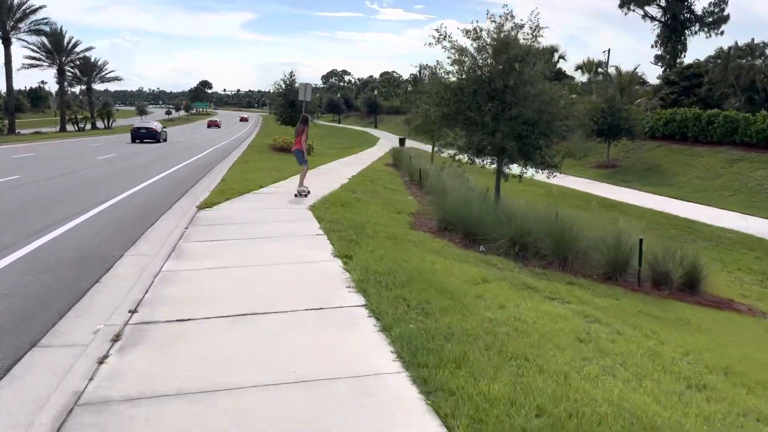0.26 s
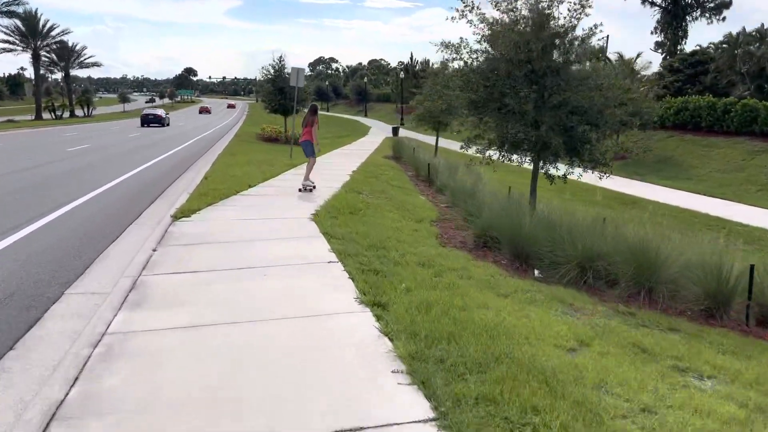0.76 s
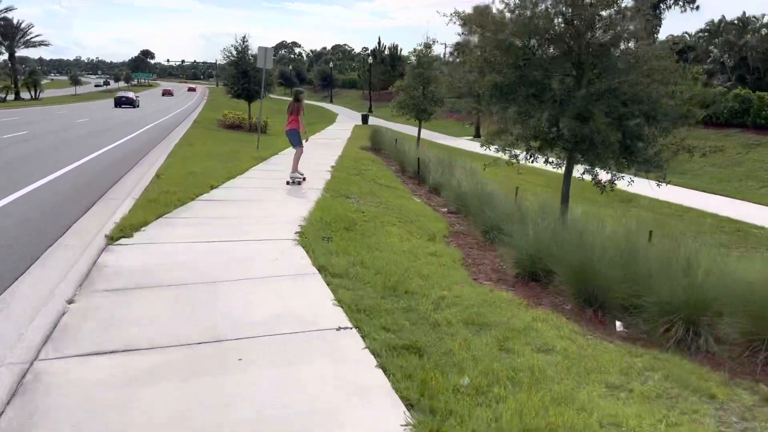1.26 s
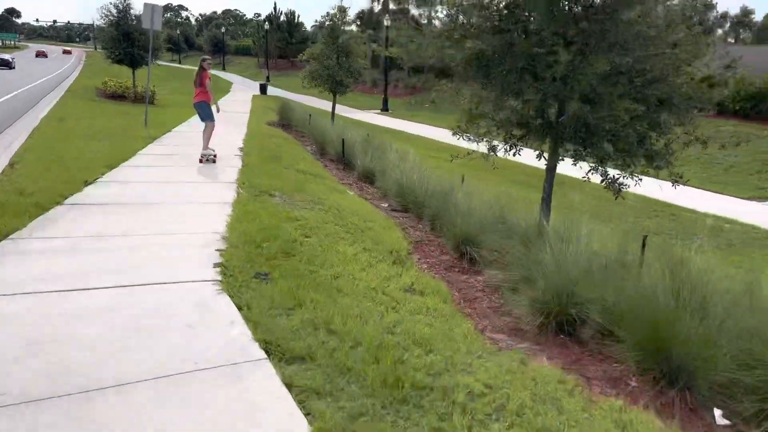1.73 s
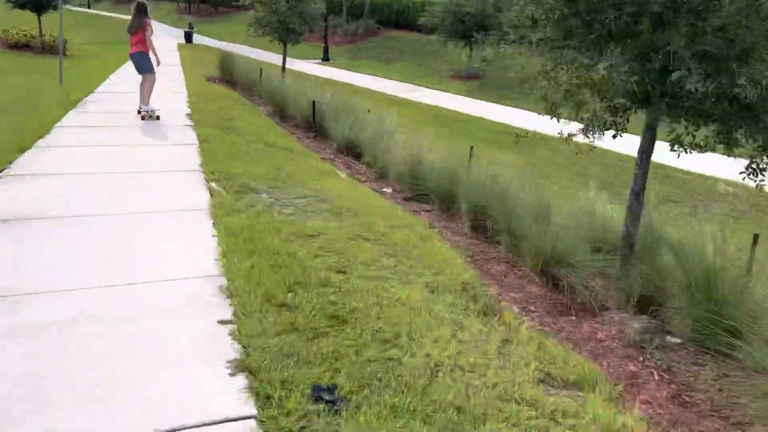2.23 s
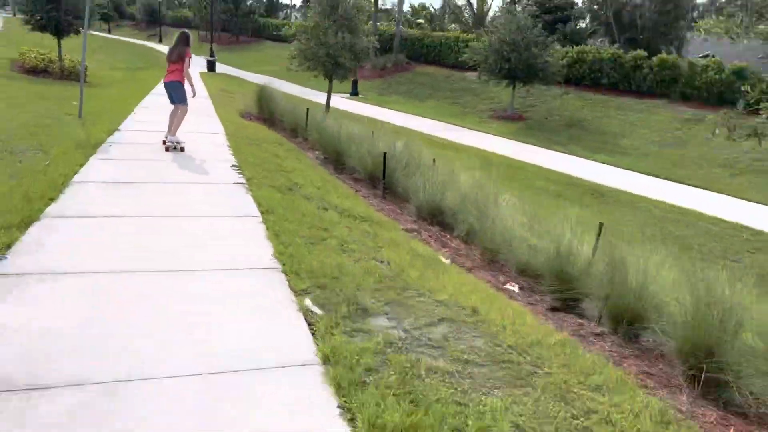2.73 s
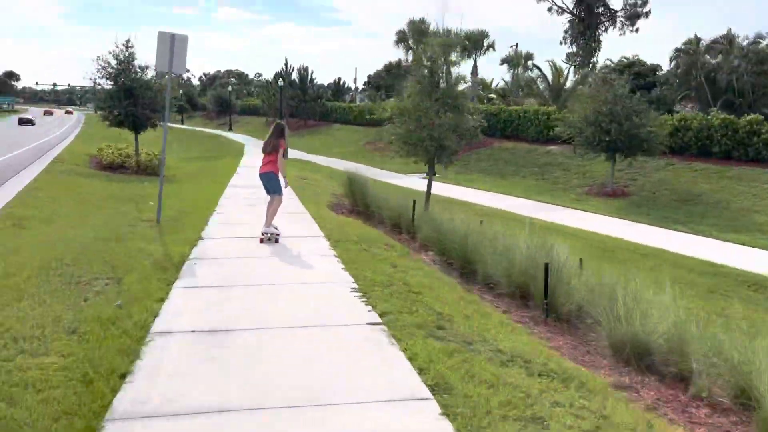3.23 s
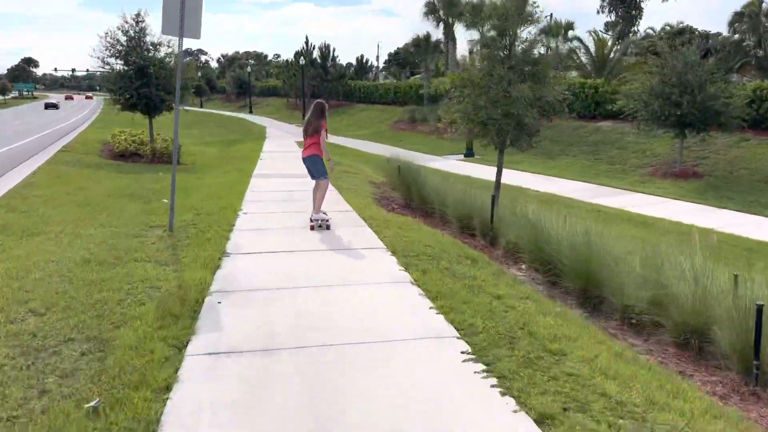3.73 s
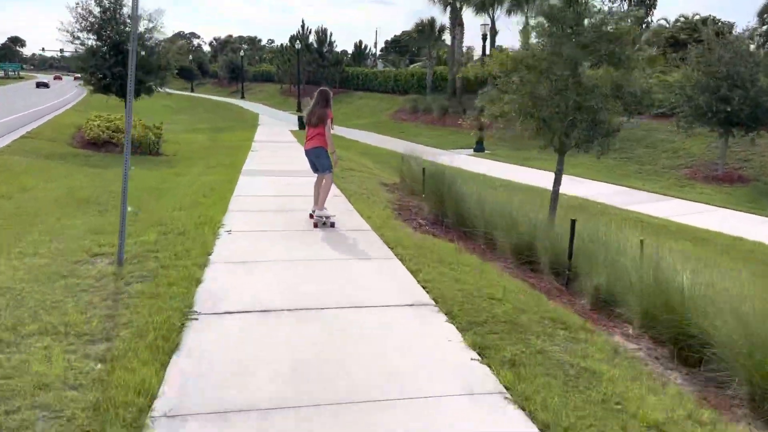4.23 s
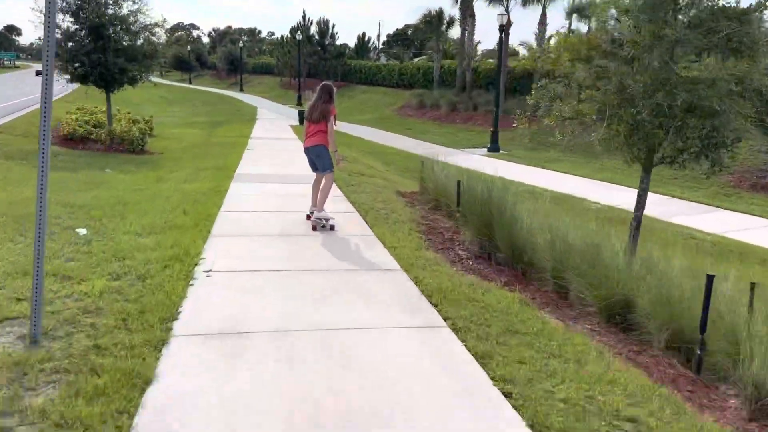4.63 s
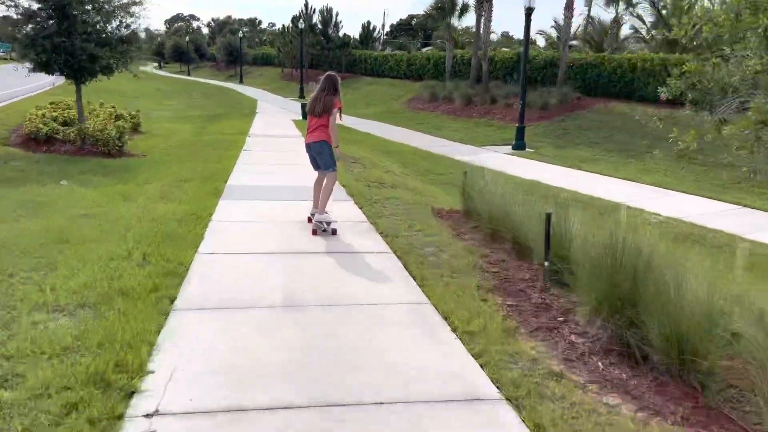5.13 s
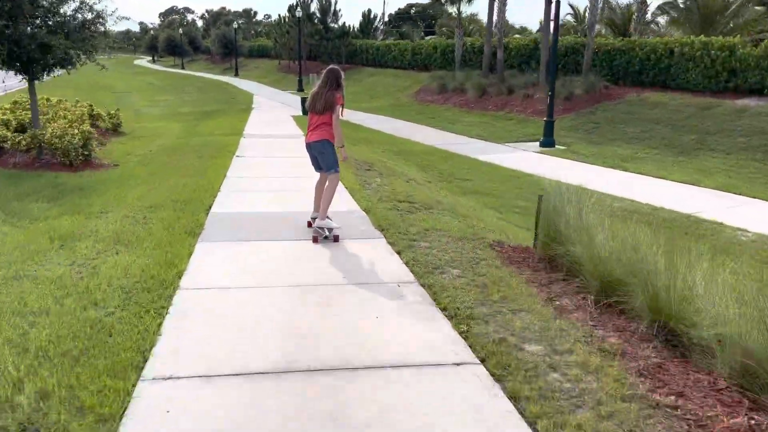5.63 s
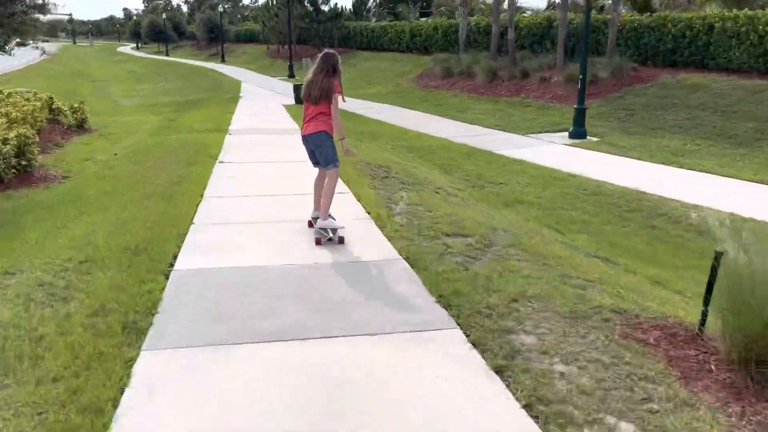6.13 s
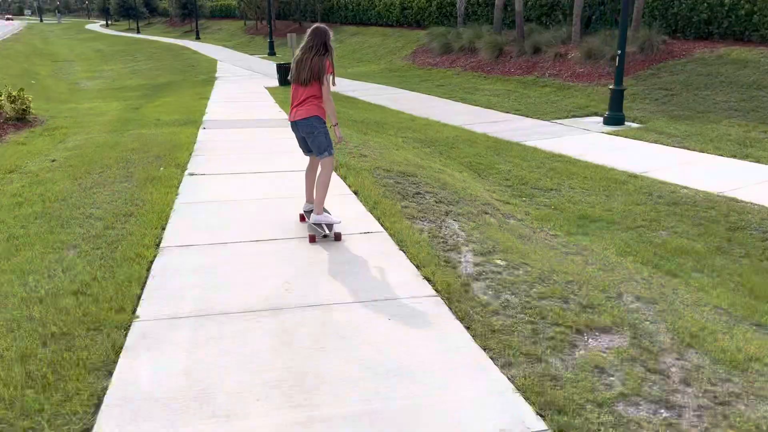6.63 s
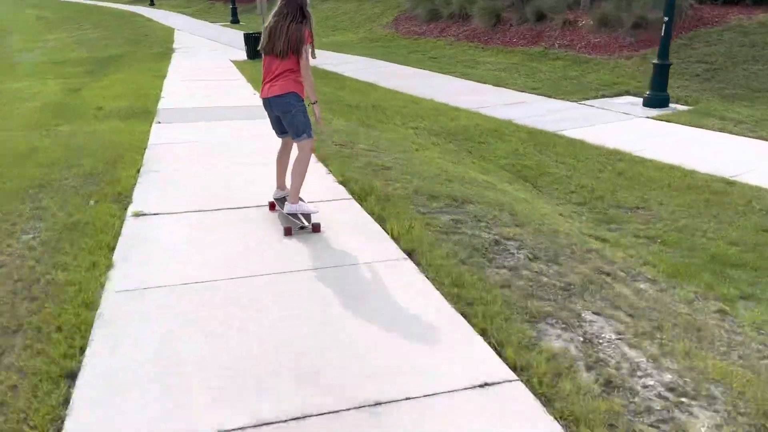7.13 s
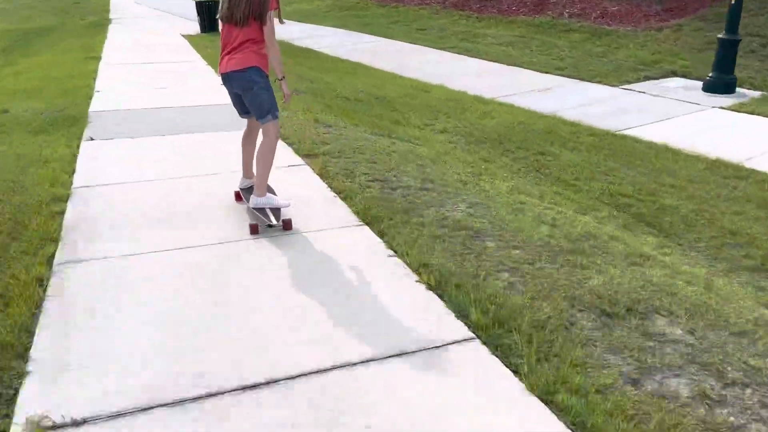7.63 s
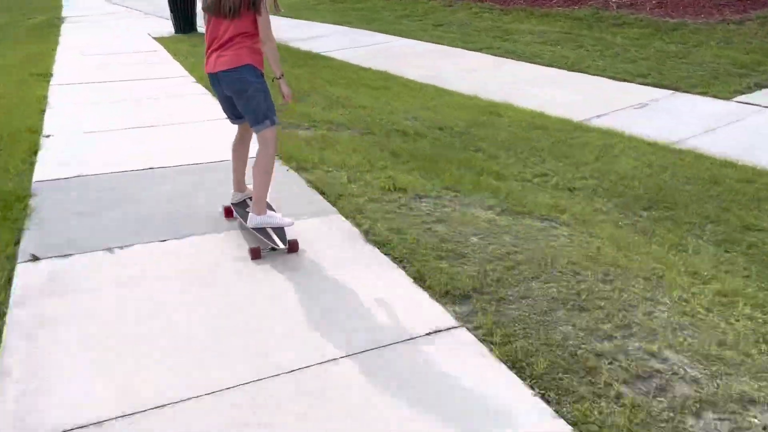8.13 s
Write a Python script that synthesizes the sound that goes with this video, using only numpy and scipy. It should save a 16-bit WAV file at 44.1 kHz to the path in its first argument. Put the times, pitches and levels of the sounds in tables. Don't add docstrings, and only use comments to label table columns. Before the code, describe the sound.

Close longboard rolling on pavement, hollow clunks at every joint quickening slightly, with passing road traffic and low gusty wind outdoors.

```python
import sys
import numpy as np
from scipy import signal
from scipy.fft import rfft, irfft, next_fast_len
from scipy.io import wavfile
from scipy.ndimage import uniform_filter1d, map_coordinates

SR = 44100
rng = np.random.default_rng(int(sys.argv[2]) if len(sys.argv) > 2 else 0)


def decibels_to_gain(level_db):
    exponent = np.asarray(level_db, float) / 20
    return 10 ** exponent


def persist_wave(psi):
    counts = np.round(np.clip(psi, -1, 1) * 32767).astype(np.int16)
    wavfile.write(sys.argv[1], SR, np.atleast_2d(counts).T)


N = 368676
M = next_fast_len(N)
HZ = np.fft.rfftfreq(M, 1 / SR)
LOG_HZ = np.log(HZ + 1)
TIME = np.arange(N) / SR
HIT_T = np.arange(SR // 16) / SR

# time in seconds, rumble in dB, deck tilt in dB per octave.
ROLLING = [(0.0, -26.5, 0), (0.46, -29.5, -4), (0.84, -26.5, -4.5), (1.19, -30, -2.5), (1.84, -26.5, -1.5),
           (2.09, -23.5, -2), (2.44, -25, -4.5), (2.62, -21.5, -1.5), (2.89, -27.5, -3), (3.61, -21, -1),
           (4.1, -24.5, 1), (4.54, -23, -1.5), (5.89, -23, 0), (6.05, -20, 0.5), (6.5, -24, 0.5),
           (7.22, -19, -1), (7.71, -22.5, 5), (7.95, -19, 1.1)]
# pitch in Hz, width in Hz, level in dB.
DECK_MODES = [(102, 51, -8), (175, 42.4, -1), (231, 48, 1), (309.7, 52, 0.5), (398, 98, 0), (469.4, 87, -3),
              (559.4, 45.5, -4.5)]
# pitch in Hz, width in Hz, level in dB.
WHEEL_MODES = [(825, 150, -1.5), (957, 240, 0.5)]
# frequency in Hz, left lead in radians.
BOARD_PHASE = [(150, .35), (400, .28), (700, .5), (1500, 2.5), (2300, .3)]
# time in seconds, tyre roar in dB, brightness in dB.
CARS = [(0.0, -34, -1), (0.44, -37.5, 1), (0.88, -35.5, 0), (1.2, -38.5, -3), (1.9, -34, 1.5),
        (2.5, -37, -0.8), (2.97, -38, -7), (3.15, -31, -8), (3.55, -30.5, -7), (3.96, -26, 0),
        (4.25, -27, -.4), (4.9, -35, .6), (5.6, -34.5, -.4), (6.38, -35, 1), (6.9, -30.5, 2),
        (7.48, -34.5, 3), (7.7, -33, 1.5), (8.36, -40.5, 0.5)]
# start in seconds, end in seconds, samples taken off the port lag.
CARS_AHEAD = [
    (2.4, 3.804, 8.3),
    (5.2, 6.75, 5.5),
]
# level in dB re roar, share of the brightness,
# swell in dB per dB of nearness, wheels of the board in dB re rumble.
TYRE_TREBLE = [
    (-12, 1.3, 0.93, -36),
    (-20, .7, 1.15, -39),
    (-29, .3, 1.5, -33),
]
# frequency in Hz, level in dB per Hz.
ROAD_COLOUR = [(250, -7), (600, -2.5), (950, -8), (1170, -0.5), (1400, -0.5), (1650, -4), (2200, -14),
               (2900, -24.5), (3700, -30), (4200, -34), (5000, -33.5), (7000, -30.5), (10500, -40),
               (12500, -43), (15500, -42.5)]
# frequency in Hz, left lead in radians.
PORT_PHASE = [(500, .5), (950, 1.4), (1200, 2.6), (1420, 3.15), (1750, 5), (2000, 6.1), (2500, 7),
              (3000, 8.1), (4000, 6.6), (6000, 5.1), (7400, 4), (7900, 3.14), (9000, 3.1), (10600, .15),
              (13200, 0), (14200, -3.1)]
# frequency in Hz, left minus right in dB.
PORT_COLOUR = [(600, 5), (1100, 1), (1450, -7), (1800, 0.5), (2400, -0.5), (4500, 6.5), (7000, 1)]
# time in seconds, pitch in Hz, level in dB.
TREAD = [(0.0, 1802, -49), (0.86, 1718, -47.5), (1.9, 1800, -53), (2.91, 1730, -56), (3.07, 1627, -36.5),
         (3.58, 1610, -46), (4.21, 1900, -52), (5.26, 1780, -53), (5.49, 1670, -40.5), (5.94, 1670, -43.5),
         (6.38, 1870, -40), (6.68, 1794, -54), (8.36, 1794, -52)]
# nearest point in seconds, passing time in seconds, pitch in Hz,
# level in dB, pitch fall as a share per second.
TYRE_SONGS = [(.4, .6, 1190, -44.5, .03), (.6, .5, 2250, -51, 0.), (1.93, .15, 3800, -56, -.1),
              (3.3, .3, 1900, -48, .02), (2.55, .2, 4000, -58, 0.), (.65, .65, 1740, -44, .02),
              (3.9, .6, 4800, -53.5, .04), (4.4, .6, 6300, -57, .03), (4.9, .35, 1800, -45.5, .03),
              (3.95, .28, 2700, -46, .06), (4.3, .7, 4000, -48.5, .03), (4.55, .4, 3450, -50, .05),
              (4.4, .4, 2950, -50, .06), (4.5, .4, 2250, -47, .08), (4.3, .2, 1950, -46, .03),
              (.8, .25, 3400, -62, .02), (7.2, .5, 2450, -49, .02), (7.05, .3, 2100, -47, .03),
              (6.9, .15, 1600, -44, .02), (7.55, .2, 1620, -45, .02), (1.75, .2, 1850, -50, -.03),
              (7.75, .25, 2480, -52, .02), (1.95, .2, 4350, -58, 0.)]
# time in seconds, level in dB.
CAR_DRONE = [
    (2.9, -60.5),
    (3.2, -33.5),
    (3.8, -30),
    (4.2, -40.5),
    (4.8, -38),
    (5.3, -43.5),
    (6.2, -37),
    (7, -37),
    (8.36, -45),
]
# frequency in Hz, level in dB per Hz.
WIND_COLOUR = [(24, -60), (30, -40), (36, -14), (45, 3.5), (75, 10), (130, 3.5), (250, -8), (500, -36.5),
               (1500, -87)]
# peak time in seconds, peak in dB, length in seconds.
GUSTS = [(0.106, -34, 0.032), (0.355, -35, .06), (0.602, -28, .08), (0.99, -31, .1), (1.297, -29.5, 0.11),
         (1.527, -30.5, 0.069), (1.76, -30, .03), (1.99, -29.5, 0.061), (2.75, -27.5, .04),
         (2.927, -26.5, 0.037), (3.7, -32.5, 0.18), (3.93, -27, .04), (4.283, -30.5, .12),
         (5.155, -29, .04), (5.97, -36, 0.092), (6.18, -24, .04), (6.6, -30, 0.15), (6.753, -24.5, .08),
         (6.953, -22.5, .06), (7.074, -24, .06), (7.19, -16.5, .035), (7.494, -23, .04), (8.0, -33.5, .4)]
# frequency in Hz, level in dB per Hz.
TOWN_COLOUR = [(40, -19), (125, 1), (280, -8), (520, -7), (900, -20), (2000, -60)]
# time in seconds, peak in dB, thud in Hz, knock in dB re thud.
FRONT_AXLE = [(0.022, -18, 120.5, -16), (0.39, -4, 244, -16), (0.739, -7.5, 185, -17),
              (1.104, -6.5, 204, -18.5), (1.419, -12, 288, -12), (1.806, -6, 215, -35),
              (2.143, -4, 190, -19), (2.141, -12, 520, -30), (2.42, -8, 221, -38), (2.729, 1.5, 300, -22),
              (3.208, -12, 252, -4.5), (3.524, -12, 460, -7.5), (3.834, -10, 243, -16.5),
              (4.129, -9, 421, -10), (4.417, -9, 532, -39), (4.7, -5, 289, -28), (4.987, -7, 326, -20.5),
              (5.274, -12.5, 554, -2.5), (5.545, -7, 255, -21.5), (5.825, -6.5, 438, -25),
              (6.087, -6, 326, -12), (6.359, -5.5, 429, -36), (6.626, -11, 419, -15),
              (6.876, -2.5, 366, -14), (7.141, -5.5, 520, -5), (7.377, -8.5, 382, -29.5),
              (7.632, -5, 462, -18.5), (7.923, -6.5, 340, -30), (8.122, -6, 323, -17)]
# time in seconds, peak in dB, thud in Hz, knock in dB re thud.
BACK_AXLE = [(0.192, -12.5, 472, -11), (0.557, -11, 330, -6), (0.908, -10, 313, -19), (1.274, -6, 344, -33),
             (1.59, -10.5, 306, -4), (1.965, -7, 290, -24), (2.304, -9.5, 547, -38),
             (2.581, -6.5, 326, -40), (2.899, 0.5, 420, -9), (3.368, -9.5, 346, -10),
             (3.632, -14, 188, -16), (3.984, -7.5, 292, -17.5), (4.276, -10.5, 514, -25),
             (4.559, -10.5, 304, -20), (4.839, -20, 414, -17), (5.134, -10, 340, -26.5),
             (5.414, -7, 204, -20), (5.691, -8, 230, -19), (5.96, -10.5, 344, -14), (6.225, -4.5, 356, -20),
             (6.752, -5, 270, -14.5), (7.014, 0.5, 330, -10.5), (7.257, -8, 367, -25),
             (7.508, -5, 367, -22), (7.759, -13.5, 395, -22.5), (8.001, -4, 330, -22.5),
             (8.245, -6, 397, -23), (8.338, -9, 330, -39)]
# time in seconds, peak in dB, thud in Hz, knock in dB re thud.
BUMPS = [(0.409, -9, 166, -17), (0.58, -14.5, 100, -16), (2.7, -9, 160, -30), (2.042, -11, 202, -30),
         (2.7435, -1.5, 330, -22), (2.9035, -5, 310, 4), (2.915, 1.5, 460, -14), (2.497, -8, 210, -30),
         (6.148, -3, 110, -25), (7.884, -7, 240, -30), (6.901, -2.5, 337, -24), (7.19, -11, 104.6, -28.5),
         (7.539, -8, 419, -29.5), (7.666, -7.5, 440, -36), (7.812, -6, 470, -32), (8.078, -10, 220, -14),
         (6.887, -7, 300, -12), (7.525, -8, 430, -30), (7.795, -8, 450, -30), (7.952, -7, 330, -30),
         (6.77, -9, 170, -30), (3.645, -10, 280, -30), (3.893, -9, 300, -30), (2.556, -10, 300, -30),
         (2.64, -10, 350, -30), (2.662, -11, 400, -30), (2.7525, -10, 210, -30), (7.176, -9, 200, -30),
         (8.064, -8, 300, -30), (4.335, -11, 450, -30), (0.287, -14, 240, -30), (7.193, -8, 260, -30),
         (6.938, -11, 160, -30), (7.635, -4, 400, -10), (4.277, -11, 190, -30), (1.808, -9, 330, -30)]
# time in seconds, peak in dB, pitch in Hz.
DECK_TAPS = [(0.029, -22, 549), (0.196, -21, 500), (1.109, -23, 506), (1.809, -23, 528), (4.134, -18, 501),
             (4.703, -24, 549), (5.138, -19, 546), (5.828, -18, 490), (5.957, -19, 546), (6.231, -17, 549),
             (6.628, -18, 565), (6.755, -18, 560), (7.147, -15, 552), (7.483, -20, 546), (7.764, -21, 501),
             (7.951, -15, 514), (8.125, -17, 500), (8.288, -19, 573)]
# time in seconds, peak in dB, pitch in Hz.
WHEEL_KNOCKS = [(0.259, -26, 939), (0.567, -14.5, 856), (0.91, -27, 964), (1.599, -20, 982),
                (2.215, -29, 934), (3.09, -21, 977), (3.791, -19, 848), (4.566, -20, 818),
                (4.703, -24, 872), (4.756, -25, 824), (5.212, -24, 826), (5.282, -15, 993),
                (5.559, -18, 767), (5.6, -23, 993), (5.862, -24, 853), (6.172, -25, 813), (6.631, -22, 850),
                (6.884, -12.5, 896), (7.013, -18, 662), (7.147, -17, 900), (4.134, -17, 850),
                (6.363, -22, 850), (7.449, -23, 773), (7.554, -22, 875), (7.588, -21, 713),
                (8.126, -17, 800), (8.163, -24, 899)]
# time in seconds, peak in dB, pitch in Hz, grit spray in dB.
CLACKS = [(0.397, -40, 1500, -46), (2.146, -37, 1510, -45), (2.7295, -15, 1900, -36),
          (2.7335, -7, 1308, -23), (2.902, -14, 1350, -42), (2.9065, -4, 1250, -40),
          (2.9185, -20, 1300, -42), (5.139, -44, 1670, -52), (6.7544, -23, 1830, -50),
          (7.016, -13, 1598, -32), (8.128, -10, 1430, -47.5), (8.2603, -10.5, 1580, -61)]
# frequency in Hz, gain in dB.
MID_KEPT = [(22, -12), (38, 0), (6900, 0), (7600, -3), (8000, -45), (9000, -45), (9500, 0), (14300, 0),
            (14550, -60)]
# frequency in Hz, gain in dB.
SIDE_KEPT = [(10000, 0), (10900, -10), (11200, -50), (13000, -50), (13800, 0), (15800, 0)]

USUAL_ROLL_DB, USUAL_CAR_DB = -24, -32.5
HUM_APART = 0.85


def unit(x):
    return x / np.sqrt(np.mean(x ** 2))


def curves(table):
    s, *columns = np.transpose(table)
    return [np.interp(TIME, s, c) for c in columns]


def shape(points):
    hz, value = np.transpose(points)
    return np.interp(LOG_HZ, np.log(hz + 1), value)


def coloured(points, channels=1):
    return rfft(rng.standard_normal((channels, M))) * decibels_to_gain(shape(points))


def noise(points, channels=1):
    return irfft(coloured(points, channels), M)[:, :N]


def filtered(x, gain):
    return irfft(rfft(x, M) * gain, M)[..., :N]


def band(x, hz, width):
    b, a = signal.iirpeak(hz, hz / width, SR)
    return signal.lfilter(b, a, signal.lfilter(b, a, x))


def walk(rate):
    k = int(SR / rate)
    steps = np.repeat(rng.standard_normal(N // k + 1), k)
    return 2.25 * uniform_filter1d(uniform_filter1d(steps, k), k)[:N]


def apart(x, share):
    return np.array([x, np.sqrt(1 - share ** 2) * x + share * np.roll(x, SR // 3)])


def ports(x):
    half = np.exp(0.5j * shape(PORT_PHASE)) * decibels_to_gain(shape(PORT_COLOUR) / 2)
    return filtered(x, np.array([half, 1 / half]))


def ring(t, hz, t60, rise):
    push = (1 - np.exp(-t / rise)) ** 2
    x = push * np.exp(-np.log(1000) * t / t60) * np.sin(2 * np.pi * hz * t)
    return x / np.abs(x).max()


def add(out, s, x):
    i = int(s * SR)
    out[i:i + len(x)] += x[:len(out) - i]


def grit(rate, spread_db):
    hit = rng.random(M) < rate / SR
    size = decibels_to_gain(spread_db * rng.exponential(size=M))
    return (hit * rng.standard_normal(M) * size)[:N]


def rolling_rumble():
    level_db, tilt_db = curves(ROLLING)
    hum_db = -12.5 - 0.51 * (level_db - USUAL_ROLL_DB)
    stones = grit(rate=1600, spread_db=0.8)
    modes = [decibels_to_gain(db) * band(stones, hz, 1.48 * width) * (-1) ** k
             for k, (hz, width, db) in enumerate(DECK_MODES)]
    deck = np.zeros(N)
    for mode, (hz, _, _) in zip(modes, DECK_MODES):
        deck += decibels_to_gain(tilt_db * np.log2(hz / 280) + 0.55 * walk(5.5)) * mode
    hum = sum(decibels_to_gain(db) * band(stones, hz, 1.15 * width) for hz, width, db in WHEEL_MODES)
    deck_pair = apart(deck, 0.25) / np.std(sum(modes))
    hum_pair = decibels_to_gain(hum_db) * apart(unit(hum), HUM_APART)
    return decibels_to_gain(level_db + 0.5 * walk(14)) * (deck_pair + hum_pair)


def tyre_gains():
    level_db, bright_db = curves(CARS)
    roll_db = uniform_filter1d(curves(ROLLING)[0], SR)
    gains = [decibels_to_gain(level_db)]
    for db, share, swell, wheels_db in TYRE_TREBLE:
        car_db = USUAL_CAR_DB + db + share * bright_db + swell * (level_db - USUAL_CAR_DB)
        gains.append(np.hypot(decibels_to_gain(car_db), decibels_to_gain(roll_db + wheels_db)))
    return np.array(gains)


def road_noise():
    below = [0, *(1 / (1 + (HZ / edge) ** 14) for edge in (1950, 3000, 5000)), 1]
    bounce = 1 + 0.25 * (1 - below[1]) * below[3] * np.exp(-2j * np.pi * HZ / 575)
    splits = np.diff(np.broadcast_arrays(*below), axis=0)
    parts = irfft(coloured(ROAD_COLOUR) * bounce * splits, M)[:, :N]
    return [decibels_to_gain(0.29 * walk(13) + patchy_db * walk(3.5)) * unit(x)
            for x, patchy_db in zip(parts, (0.4, 0.7, 0.7, 0.8))]


def kerb(x):
    near_db = uniform_filter1d(curves(CARS)[0], SR // 4) - USUAL_CAR_DB
    lag_s = 0.00078 + 0.000016 * near_db
    echo = map_coordinates(x, [np.arange(N) - lag_s * SR], order=1, mode="nearest")
    return (x + 0.25 * echo) / np.hypot(1, 0.25)


def turned(pair):
    lead = 1.07
    for start, end, samples in CARS_AHEAD:
        lead = lead + np.interp(TIME, [start, start + 0.55, end - 0.35, end], [0, samples, samples, 0])
    return np.array([pair[0], map_coordinates(pair[1], [np.arange(N) + lead], order=3, mode="nearest")])


def tread(width_hz=133):
    hz, db = curves(TREAD)
    a, b = noise([(width_hz, 0), (4.2 * width_hz, -30), (9000, -90)], channels=2)
    turn = 2 * np.pi * np.cumsum(hz) / SR
    return decibels_to_gain(db) * unit(a * np.cos(turn) + b * np.sin(turn))


def tyre_songs():
    hiss, out = rng.standard_normal(N), np.zeros(N)
    for s, length, hz, db, fall in TYRE_SONGS:
        near = slice(max(int((s - 2 * length) * SR), 0), int((s + 2 * length) * SR))
        late = TIME[near] - s
        width = 0.075 * hz * (hz / 2000) ** 0.8
        song = unit(band(hiss[near], hz, width))
        read_at = (late - late[0] - 0.5 * fall * late ** 2) * SR
        heard = map_coordinates(song, [read_at], order=2, mode="mirror")
        out[near] += decibels_to_gain(db) * np.exp(-(late / length) ** 4) * heard
    return out


def car_drone():
    colour = [(400, -21), (700, -5.5), (900, 5), (1100, -3.5), (1500, -32.5), (4000, -86)]
    return decibels_to_gain(curves(CAR_DRONE)[0]) * apart(unit(noise(colour)[0]), HUM_APART)


def far_traffic():
    tilt = [(300, 2), (600, 7), (900, 2.5), (3000, 1.5), (6000, 4), (7600, -1), (9500, 0.5)]
    far = coloured(ROAD_COLOUR, channels=2) * decibels_to_gain(shape(tilt))
    return decibels_to_gain(-40.5) * unit(irfft(far, M)[:, :N])


def traffic():
    gains = tyre_gains()
    roar, whine, hiss, air = gains * road_noise()
    near = turned(ports(roar + kerb(whine))) + ports(0.75 * kerb(hiss) + air)
    scatter_gain = decibels_to_gain([[-11], [-7], [-2.5], [-14]])
    scatter = [np.sum(gains * road_noise() * scatter_gain, axis=0) for port in range(2)]
    bands = tread() + tyre_songs()
    band_pair = decibels_to_gain([[1.5], [-1.5]]) * np.array([bands, np.roll(bands, 2)])
    return near + scatter + car_drone() + far_traffic() + band_pair


def wind():
    power = decibels_to_gain(2 * -35.5)
    for s, db, length in GUSTS:
        side = length * np.where(TIME < s, 0.85, 1.17)
        power = power + decibels_to_gain(2 * db) * np.exp(-((TIME - s) / side) ** 2)
    shared, left, right = noise(WIND_COLOUR, channels=3)
    return np.sqrt(power) * unit(np.array([1.1 * shared + 0.55 * left, 0.93 * shared + 0.52 * right]))


def town():
    return decibels_to_gain(-40.5) * unit(noise(TOWN_COLOUR, channels=2))


def spray_burst():
    peak_s = 0.005
    return np.exp(-((HIT_T - peak_s) / np.where(HIT_T < peak_s, 0.0028, 0.0033)) ** 2)


def axle_drops():
    body, crack, spray = np.zeros(N), np.zeros(N), spray_burst()
    top_mode_hz, spray_db = 590, -45
    for table, ring_s in ((FRONT_AXLE, 0.038), (BACK_AXLE, 0.033), (BUMPS, 0.026)):
        for s, db, hz, knock_db in table:
            t60 = max(ring_s - 0.0012 * (db + 8), 0.01)
            thud = ring(HIT_T, hz, t60, 0.0026)
            thud += decibels_to_gain(-9.5) * ring(HIT_T, min(hz * 1.578, top_mode_hz), t60 * 0.77, 0.0027)
            thud += decibels_to_gain(-6.5) * ring(HIT_T, hz * 0.6, t60 * 1.15, 0.0027)
            low_hz, high_hz = np.array([880, 1050]) * (1 + 0.05 * rng.standard_normal(2))
            knock = ring(HIT_T, low_hz, 0.026, 0.0015) + 0.7 * ring(HIT_T, high_hz, 0.028, 0.002)
            add(body, s + 0.00204, decibels_to_gain(db - 2.5) * thud)
            add(body, s + 0.00409, decibels_to_gain(db + knock_db - 3.5) * knock)
            add(crack, s + 0.00029, decibels_to_gain(db + spray_db) * spray)
    return body, crack


def grit_spray(crack):
    colour = [(1200, -6), (2200, 6), (4000, 4), (5500, -1), (7500, 3), (11000, -8), (14000, -24)]
    return ports(crack * unit(noise(colour)[0]))


def deck_taps():
    out = np.zeros(N)
    for s, db, hz in DECK_TAPS:
        add(out, s - 0.002, decibels_to_gain(db - 0.6) * ring(HIT_T, hz, 0.035, 0.0012))
    return out


def wheel_knocks():
    out = np.zeros(N)
    for s, db, hz in WHEEL_KNOCKS:
        knock = sum(g * ring(HIT_T, hz * k, 0.026, 0.0013) for k, g in ((0.78, 0.6), (1, 1), (1.24, 0.55)))
        add(out, s - 0.002, decibels_to_gain(db - 2.5) * knock)
    return out


def truck_clacks():
    body, crack, spray = np.zeros(N), np.zeros(N), spray_burst()
    partials = ((1, 1), (1.22, 0.75), (1.5, 0.37), (1.85, 0.17), (2.3, 0.069))
    for s, db, hz, spray_db in CLACKS:
        clack = sum(g * ring(HIT_T, hz * k, 0.024, 0.0011) for k, g in partials)
        add(body, s - 0.0015, decibels_to_gain(db - 7.5) * clack)
        add(crack, s - 0.0045, decibels_to_gain(spray_db) * spray)
    return body, crack


def bearing_squeak():
    out = np.zeros(N)
    add(out, 5.342, decibels_to_gain(-39.5) * ring(HIT_T, 3530, 0.046, 0.0029))
    return out


def scene():
    drops, drop_grit = axle_drops()
    clacks, clack_grit = truck_clacks()
    blows = drops + deck_taps() + wheel_knocks() + clacks + bearing_squeak()
    left, right = rolling_rumble() + blows
    right = filtered(right, np.exp(-1j * shape(BOARD_PHASE)))
    lean_db = np.interp(TIME, [0, 5.6, 6.4, 8.36], [0.96, 0.82, 0.66, 0.54])
    board = np.array([decibels_to_gain(lean_db) * left, decibels_to_gain(-lean_db) * right])
    return board + grit_spray(drop_grit + clack_grit) + traffic() + wind() + town()


def roll_off(x):
    return signal.sosfilt(signal.butter(12, 15800, fs=SR, output="sos"), x)


def record(dry):
    x = np.tanh(0.9 * dry) / 0.92
    mid = filtered((x[0] + x[1]) / 2, decibels_to_gain(shape(MID_KEPT)))
    side = filtered((x[0] - x[1]) / 2, decibels_to_gain(shape(SIDE_KEPT)))
    return roll_off(np.array([mid + side, mid - side]))


dry = scene()
out = record(dry)
persist_wave(out)
```